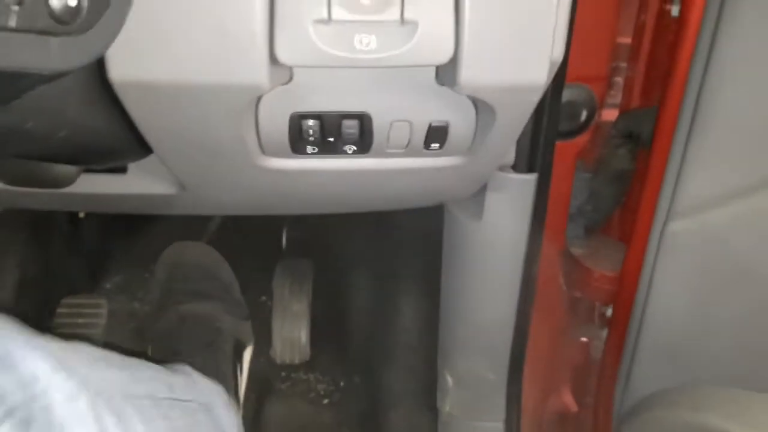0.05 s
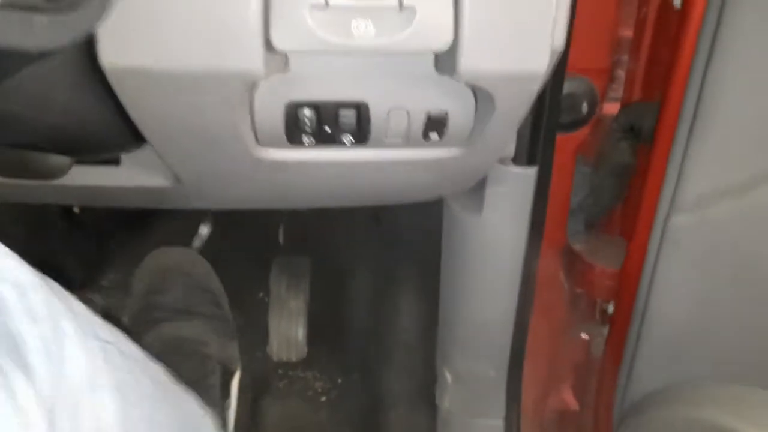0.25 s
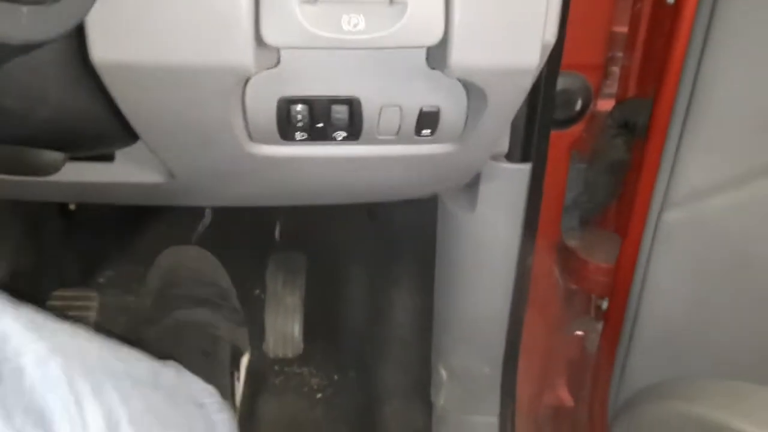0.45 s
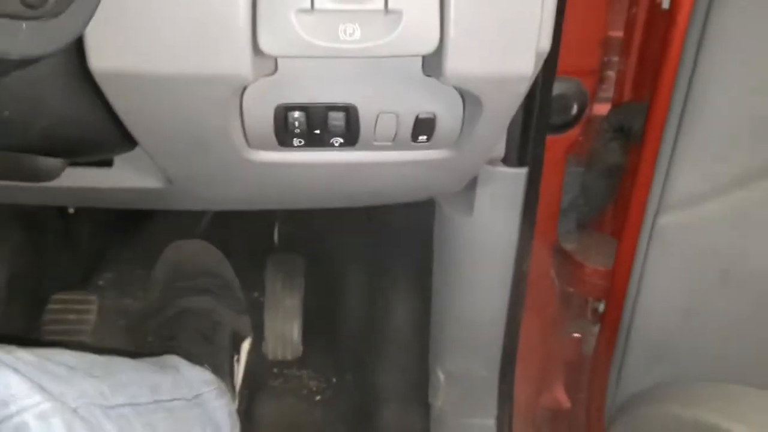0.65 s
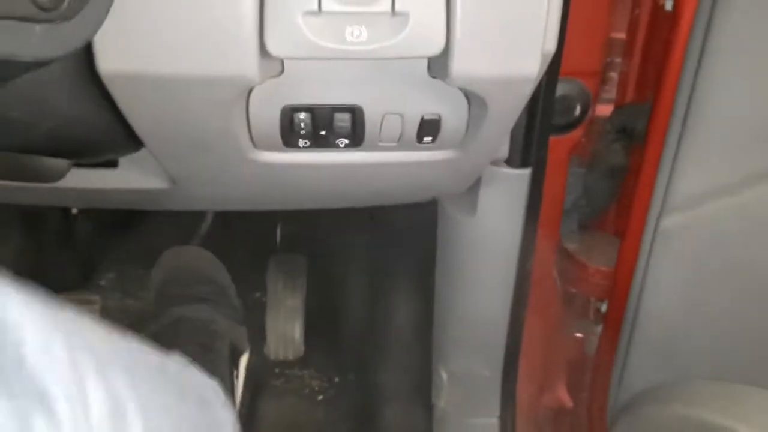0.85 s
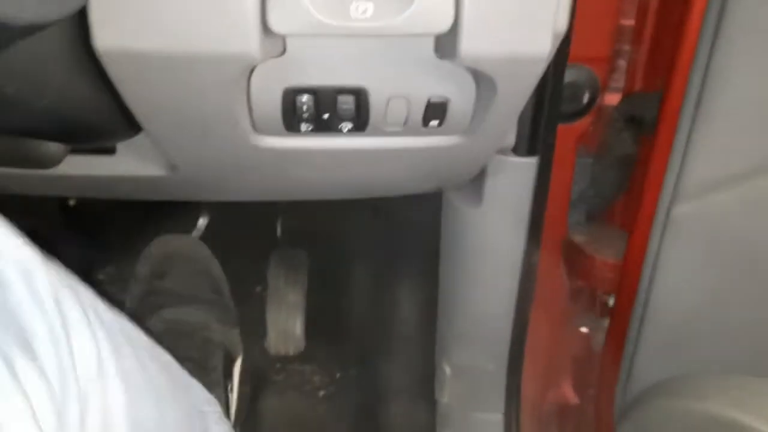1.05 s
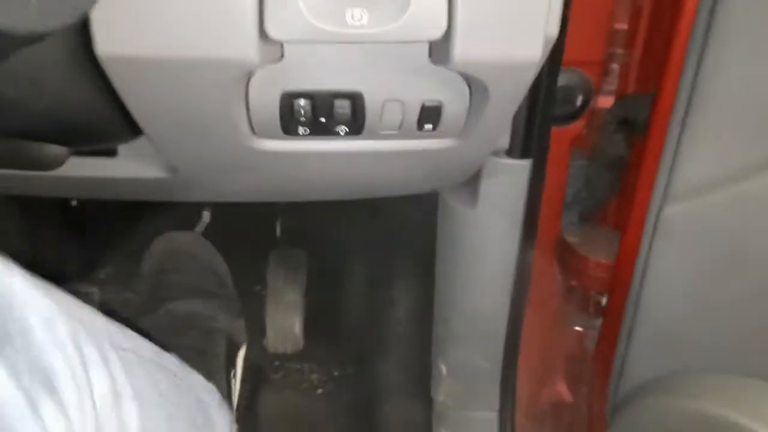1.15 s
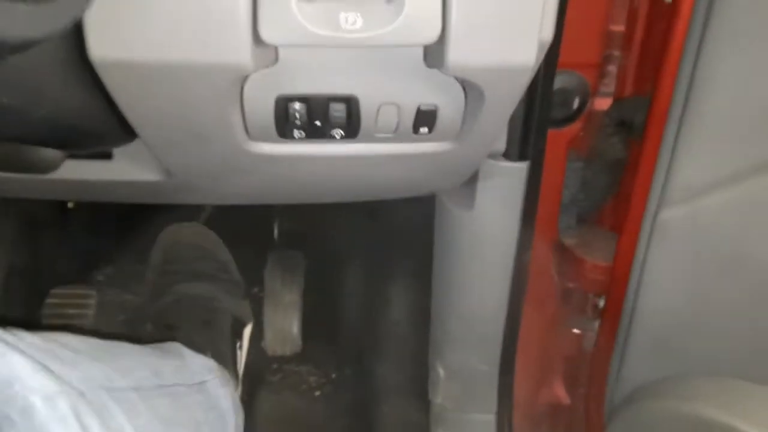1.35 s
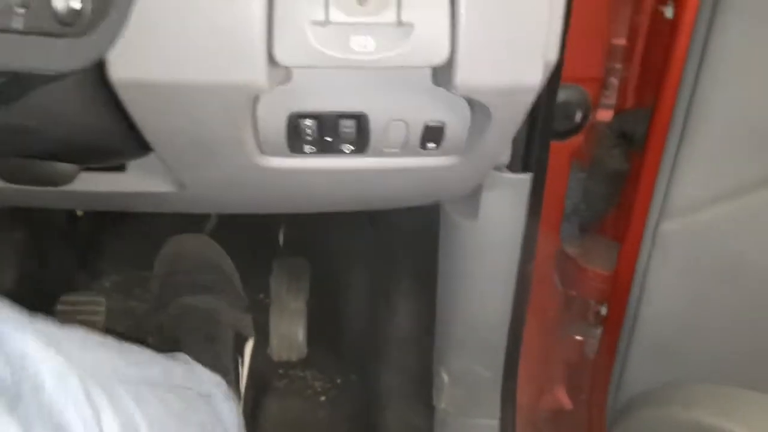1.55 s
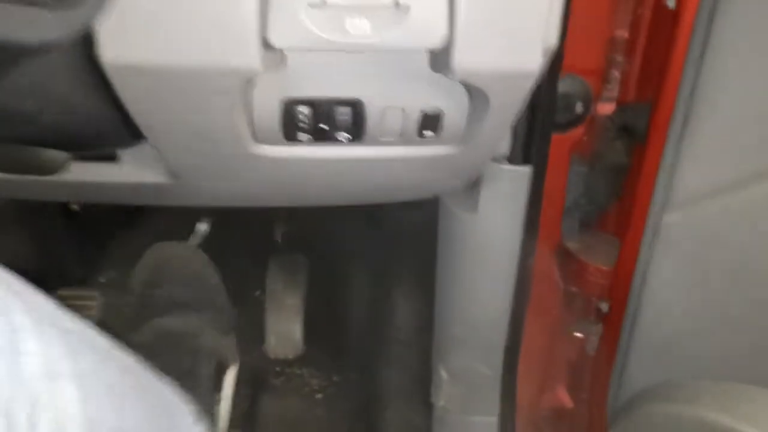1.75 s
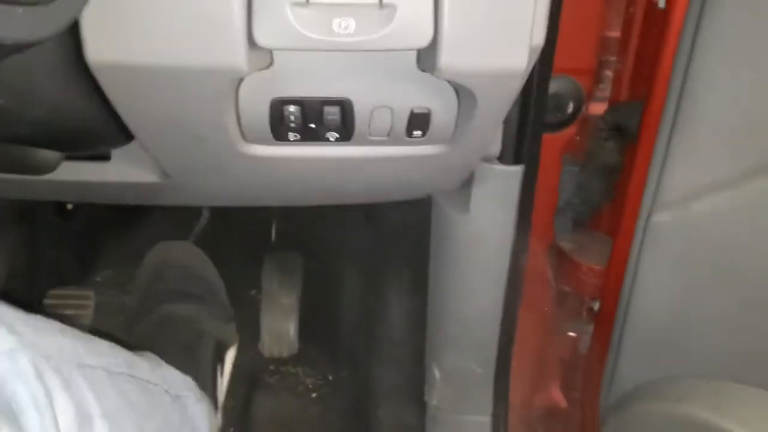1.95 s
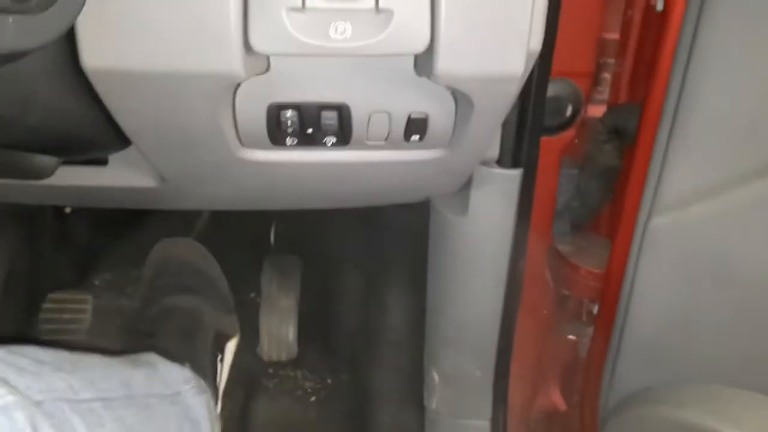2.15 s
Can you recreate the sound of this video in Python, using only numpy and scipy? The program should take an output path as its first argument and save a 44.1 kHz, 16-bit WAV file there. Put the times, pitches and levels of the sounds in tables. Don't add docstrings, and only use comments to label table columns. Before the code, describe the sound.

A brake pedal is pumped three times in a quiet parked car. The first, strongest stroke runs about 0.14-0.45 s, with a double thunk at 0.2 and 0.32; the second about 0.87-1.17, the third 1.6-1.9. Each is a cluster of dull floor thuds, hollow bracket ring, sharp linkage clacks and trim rattle. Between them come faint creaks, small clicks, cloth rustle and low cabin sway. Close, dry phone sound.

```python
import sys
import numpy as np
from scipy import signal
from scipy.fft import rfft, irfft
from scipy.io import wavfile
from scipy.ndimage import uniform_filter1d

SR = 44100
rng = np.random.default_rng(int(sys.argv[2]) if len(sys.argv) > 2 else 0)


def undo_db(level):
    steps = np.asarray(level, float) / 20
    return 10 ** steps


def put_to_file(sound):
    columns = np.atleast_2d(sound).T
    safe = np.clip(columns, -1, 1)
    whole_steps = np.round(safe * 32767)
    wavfile.write(sys.argv[1], SR, whole_steps.astype(np.int16))


N = 97020


def evened(x):
    return x / np.sqrt(np.mean(x ** 2) + 1e-20)


def noise(length):
    return rng.standard_normal((2, length))


def decay(t, t60_s):
    return -60 * t / t60_s


def read(points, hz):
    f, value = np.transpose(points)
    return np.interp(np.log(hz + 1), np.log(f + 1), value)


def curve(points):
    s, db = np.transpose(points)
    return undo_db(np.interp(np.arange(N) / SR, s, db))


def add(mix, start_s, sound):
    part = mix[..., round(start_s * SR):][..., :sound.shape[-1]]
    part += sound[..., :part.shape[-1]]


def coloured(x, points):
    hz = np.fft.rfftfreq(x.shape[-1], 1 / SR)
    inside = (hz > points[0][0]) & (hz < points[-1][0])
    return evened(irfft(rfft(x) * undo_db(read(points, hz)) * inside, x.shape[-1]))


def band(x, centre_hz, width):
    hz = np.fft.rfftfreq(x.shape[-1], 1 / SR) + 1
    detuning = hz / centre_hz - centre_hz / hz
    return evened(irfft(rfft(x) / (1 + 1j * detuning / width) ** 2, x.shape[-1]))


def struck(rows, rise_s, t60_s, db, sag=0.):
    out, t = np.zeros(N), np.arange(SR // 3) / SR
    phases = rng.random((len(rows), 1))
    for (start_s, level_db, pitch_hz), phase in zip(rows, phases):
        turns = pitch_hz * (t * (1 - sag) + sag * 0.025 * (1 - np.exp(-t / 0.0069)))
        rise = np.sin(np.pi / 2 * np.minimum(t / rise_s, 1)) ** 2
        shape = rise * undo_db(decay(t, t60_s))
        add(out, start_s, undo_db(level_db + db) * shape * np.sin(2 * np.pi * (turns + phase)))
    return out


# start_s, level_db
PIVOT_DRAG = [(0, -58.5), (.10, -65), (.22, -30.5), (.4, -31.5), (.5, -58.5), (.71, -72.5), (.75, -65.5),
              (.82, -58.5), (.95, -31), (1.14, -35.5), (1.28, -59.5), (1.455, -70), (1.49, -55),
              (1.56, -62.5), (1.7, -32), (1.88, -33), (1.95, -52.5), (2.2, -80.5)]
# pitch_hz, width_hz, level_db
BODY_RESONANCES = [(71.5, 21, -0.5), (102, 44.3, 5.5), (158.6, 39.8, 5), (320, 76, -3.5)]
# pitch_hz, level_db
TRIM_COLOUR = [(360, -16.5), (420, -1.5), (560, -5), (640, -10.5), (850, -14.5), (1300, -16.5), (2400, -18)]
SLIPS_PER_S, SLIP_SPREAD_DB = 500, 6
DRAG_DB, TRIM_DB = 1.5, -16.5
HEAVY = 1.126


def drag():
    size = undo_db(SLIP_SPREAD_DB * np.minimum(rng.exponential(1, N), 4))
    happens = rng.random(N) < SLIPS_PER_S / SR
    slips = size * happens * rng.choice([-1, 1], N)
    hz = np.fft.rfftfreq(N, 1 / SR)
    response = sum(undo_db(db) / (1 + 2j * (hz - f) / w) ** 2 for f, w, db in BODY_RESONANCES)
    level = curve(PIVOT_DRAG) * undo_db(DRAG_DB)
    push = level * (level / level.max()) ** (HEAVY - 1)
    low = push * evened(irfft(rfft(slips) * response, N))
    trim = level * undo_db(TRIM_DB) * coloured(noise(N), TRIM_COLOUR)
    return low, trim


# start_s, level_db, pitch_hz
BRACKET_CREAKS = [(0, -50.5, 293), (.105, -38, 331), (.265, -37, 301), (.52, -46.5, 275), (.735, -50, 311),
                  (.825, -45, 330), (1.31, -50.5, 274), (1.465, -53.5, 314), (1.572, -46, 302),
                  (1.632, -28, 330), (1.85, -37.5, 304), (2.02, -49.5, 280)]
RING_DB = 2


def creaks():
    return struck(BRACKET_CREAKS, rise_s=0.023, t60_s=0.15, db=RING_DB)


# start_s, level_db
LEG_MOVES = [(0, -70), (.12, -65.5), (.35, -56.5), (.55, -66), (.69, -77.5), (.78, -65.5), (1., -64.5),
             (1.2, -60.5), (1.44, -71.5), (1.6, -65.5), (1.85, -60.5), (2.05, -63), (2.2, -80.5)]
# pitch_hz, level_db
CLOTH_COLOUR = [(400, -5), (700, -13.5), (1700, -14), (5000, -11.5), (8500, -12.5), (9300, -23),
                (12500, -17.5), (16200, -23)]
LEG_DB, PATCH_DB, FLICKER_DB = 1.5, 0.7, 0.7


def cloth():
    frames = N // 64 + 5
    a, b, c, d, patches = rng.standard_normal((frames, 129, 5)).T
    patches = uniform_filter1d(patches, size=5, axis=0)
    patches = evened(uniform_filter1d(patches, size=30, axis=1))
    flicker = evened(uniform_filter1d(rng.standard_normal(frames), size=6))
    z = np.array([a + 1j * b, c + 1j * d]) * undo_db(PATCH_DB * patches + FLICKER_DB * flicker)
    rustle = signal.istft(z, nperseg=256, noverlap=192)[1][:, :N]
    return curve(LEG_MOVES) * undo_db(LEG_DB) * coloured(rustle, CLOTH_COLOUR)


# start_s, level_db, pitch_hz
BODY_SWAYS = [
    (0.451, -40, 97),
    (0.489, -56, 281.5),
    (1.169, -43, 81),
    (1.93, -37, 61),
    (2.001, -56, 280),
]
RUMBLE_HZ, RUMBLE_DB = 95, -2
DEEP_HZ, DEEP_DB = 45, 4.5
SWAY_RISE_S, SWAY_T60_S, SWAY_WIDTH = 0.022, 0.38, 0.4


def rumble():
    leg = curve(LEG_MOVES)
    out = leg * undo_db(RUMBLE_DB) * band(noise(N), RUMBLE_HZ, 0.35)
    out += leg * undo_db(DEEP_DB) * band(noise(N), DEEP_HZ, 0.6)
    t = np.arange(SR // 2) / SR
    for start_s, level_db, pitch_hz in BODY_SWAYS:
        shape = np.minimum(t / SWAY_RISE_S, 1) * undo_db(level_db + decay(t, SWAY_T60_S))
        width = SWAY_WIDTH * np.sqrt(RUMBLE_HZ / pitch_hz)
        add(out, start_s, shape * band(noise(len(t)), pitch_hz, width))
    return out


# start_s, level_db, pitch_hz
BRACKET_JOLTS = [(0.114, -49, 330), (0.138, -29, 315), (0.162, -29, 300), (0.2, -17.5, 311),
                 (0.222, -17.5, 321.7), (0.252, -38, 310), (0.31, -19, 324), (0.324, -12.5, 329.7),
                 (0.339, -15.5, 341), (0.751, -52.5, 311), (0.843, -39, 316), (0.885, -25.5, 305),
                 (0.938, -17, 333), (0.957, -23.5, 299.6), (1.009, -27.5, 361), (1.033, -20.5, 325),
                 (1.073, -41, 372), (1.088, -20.5, 319), (1.162, -39.5, 356), (1.485, -53.5, 322),
                 (1.586, -40, 289), (1.616, -28.5, 313), (1.675, -28.5, 290), (1.698, -15, 307.4),
                 (1.816, -14.5, 314)]


def rings():
    return struck(BRACKET_JOLTS, rise_s=0.007, t60_s=0.1, db=RING_DB)


PAN_SWING = dict(rise_s=0.014, t60_s=0.072, db=7.5, sag=0.06)
# start_s, level_db, pitch_hz
MORE_PAN_KNOCKS = [(.2, -19.5, 100), (.238, -23.5, 95.5), (.283, -34, 80.3), (.48, -32.5, 95), (1.115, -27, 98),
                   (1.145, -23.5, 87.5), (1.66, -36, 101.2), (1.735, -32, 81.5), (1.785, -23, 110),
                   (1.822, -16.5, 84), (.133, -41, 90.4), (.865, -33, 85), (1.61, -47, 89.5), (1.635, -28, 139.4),
                   (1.85, -20.5, 88.3)]


def more_thuds():
    return struck(MORE_PAN_KNOCKS, **PAN_SWING)


# start_s, level_db, pitch_hz
PAN_KNOCKS = [(0.137, -36.5, 138), (0.166, -24, 81.4), (0.196, -14, 153), (0.221, -19, 120),
              (0.242, -24, 179), (0.316, -11.5, 160), (0.337, -14, 139), (0.366, -12.5, 107.4),
              (0.394, -19, 95), (0.422, -30, 115), (0.878, -29, 176.3), (0.906, -27, 109),
              (0.929, -14, 148), (0.973, -24.5, 113), (0.998, -31, 140), (1.03, -25, 150),
              (1.058, -21, 123), (1.084, -16, 155), (1.149, -34.5, 102.6), (1.642, -26.5, 110),
              (1.697, -12.5, 136), (1.753, -18.5, 158), (1.811, -14.5, 154), (1.827, -17.5, 69),
              (1.849, -30, 102), (1.872, -30.5, 71.5)]


def thuds():
    return struck(PAN_KNOCKS, **PAN_SWING)


# start_s, level_db, fizz_db (over 9 kHz), ping_hz
LINKAGE_CLACKS = [(0.138, -46, -16.5, 4250), (0.158, -37, -13, 4380), (0.2039, -28.5, -4, 5530),
                  (0.2401, -37, 2.5, 4300), (0.3089, -26.5, -25, 2940), (0.3384, -28.5, -19.5, 4040),
                  (0.8642, -45, -13, 4440), (0.8836, -38.5, -13, 4830), (0.9342, -39, -17, 1953),
                  (0.9437, -38.5, -2, 6000), (0.9767, -37.5, -12, 5730), (1.043, -47.5, -38, 4470),
                  (1.0908, -38.5, -45, 2340), (1.1605, -42.5, -11.5, 3550), (1.6145, -47.5, -12, 4570),
                  (1.6386, -39, -13, 4620), (1.7024, -34.5, -5.5, 7530), (1.727, -38.5, -24, 6330),
                  (1.7376, -39, -5.5, 7160), (1.7906, -45.5, -25, 4290), (1.8174, -33, -32, 2310)]
# pitch_hz, level_db
SNAP_COLOUR = [(1800, -7), (2300, 4.5), (3000, 1), (4200, 2), (5500, -5), (8500, -1.5), (9100, -29.5)]
# pitch_hz, level_db
FIZZ_COLOUR = [(8800, -6), (10000, -9), (13000, 0), (15000, -8), (16200, -22)]
SNAP_DB, SNAP_RISE_S, SNAP_T60_S = -4, 0.0025, 0.066
SNAP_TAIL_DB, SNAP_TAIL_T60_S = -12.5, 0.44
GRIT_DB, GRIT_GROWS_S = 4, 0.025
PING_DB, PING_T60_S, PING_WIDTH = 1.5, 0.053, 0.2
TONE_DB, TONE_T60_S = -6, 0.03
LINK_HZ, LINK_DB = 4220, -6
FIZZ_DB, FIZZ_T60_S = 3.5, 0.043
FIZZ_TAIL_DB, FIZZ_TAIL_T60_S, FIZZ_TAIL_RISE_S = -25.5, 0.53, 0.022


def clacks():
    out, t = np.zeros((2, N)), np.arange(SR // 4) / SR
    rise = np.minimum(t / SNAP_RISE_S, 1) ** 2
    for start_s, level_db, fizz_db, ping_hz in LINKAGE_CLACKS:
        a, b, d, e = rng.standard_normal((4, 2, len(t)))
        rough = evened(uniform_filter1d(e[0], size=60))
        grit = undo_db(GRIT_DB * np.minimum(t / GRIT_GROWS_S, 1) * rough)

        snap_shape = grit * undo_db(decay(t, SNAP_T60_S))
        snap_tail = undo_db(SNAP_TAIL_DB + decay(t, SNAP_TAIL_T60_S))
        snap = coloured(a, SNAP_COLOUR) * (snap_shape + snap_tail)

        ping = undo_db(PING_DB + decay(t, PING_T60_S)) * band(d, ping_hz, PING_WIDTH)
        tone = np.sin(2 * np.pi * (ping_hz * t + d[:, :1]))
        tone = tone + undo_db(LINK_DB) * np.sin(2 * np.pi * (LINK_HZ * t + e[:, :1]))
        ping = ping + undo_db(TONE_DB + decay(t, TONE_T60_S)) * tone

        fizz_shape = grit * undo_db(fizz_db + FIZZ_DB + decay(t, FIZZ_T60_S))
        fizz_tail = np.minimum(t / FIZZ_TAIL_RISE_S, 1) * undo_db(FIZZ_TAIL_DB + decay(t, FIZZ_TAIL_T60_S))
        fizz = coloured(b, FIZZ_COLOUR) * (fizz_shape + fizz_tail)
        add(out, start_s - SNAP_RISE_S / 2, rise * undo_db(level_db + SNAP_DB) * (snap + ping + fizz))
    return out


# start_s, level_db, panel_hz
PANEL_BLOWS = [(.200, -31.5, 667), (.212, -30, 606), (.240, -33.5, 670), (.309, -34.5, 845),
               (.318, -27, 539), (.338, -24.5, 897), (.934, -31, 623), (.976, -37, 1320), (1.026, -40, 640),
               (1.090, -29.5, 965), (1.693, -31.5, 528), (1.728, -37.5, 710), (1.757, -47.5, 540),
               (1.817, -27, 910)]
# start_s, level_db, pitch_hz, t60_s, width (share of pitch)
TRIM_TICKS = [(0.35, -55, 5040, 0.1, .8), (0.58, -61, 610, 0.19, 0.32), (0.595, -58, 3450, 0.03, 0.55),
              (1.32, -56.5, 572, 0.28, 0.46), (1.875, -39.5, 3880, 0.044, 0.73),
              (1.877, -42, 8000, 0.046, .15), (2.05, -58, 581, 0.3, 0.75), (2.07, -61, 1620, 0.26, 0.56),
              (.15, -46.5, 695, 0.17, .5), (.88, -45, 744, 0.09, 0.64), (1.6, -50.5, 616, 0.2, 0.27)]
BLOW_RISE_S, BLOW_T60_S = 0.003, 0.07
PANEL_DB, PANEL_WIDTH = -2.5, 0.35


def panels():
    out, t = np.zeros((2, N)), np.arange(SR // 4) / SR
    for start_s, level_db, panel_hz in PANEL_BLOWS:
        a, b = rng.standard_normal((2, 2, len(t)))
        buzz = coloured(a, TRIM_COLOUR) + undo_db(PANEL_DB) * band(b, panel_hz, PANEL_WIDTH)
        shape = np.minimum(t / BLOW_RISE_S, 1) * undo_db(level_db + decay(t, BLOW_T60_S))
        add(out, start_s, shape * buzz)
    for start_s, level_db, pitch_hz, t60_s, width in TRIM_TICKS:
        shape = np.minimum(10 * t / t60_s, 1) * undo_db(level_db + decay(t, t60_s))
        add(out, start_s, shape * band(noise(len(t)), pitch_hz, width))
    return out


# pitch_hz, level_db, t60_s
MODES = [(416.4, -7.5, 0.13), (521, -0.5, 0.082), (625.6, -7, 0.14), (665.4, -4, 0.12), (838, -7, 0.21),
         (990, -14, 0.31), (1050.6, -8.5, 0.13), (1205, -6.5, 0.11), (1343, -9.5, .13), (1455, -8.5, .12),
         (1990, -15.5, .12)]
MODE_DB, MODE_SPREAD_DB = -8, 4


def panel_modes():
    out, t = np.zeros((2, N)), np.arange(SR // 4) / SR
    pitch_hz, mode_db, t60_s = np.transpose(MODES)[:, :, None]
    for start_s, level_db, _ in PANEL_BLOWS:
        share, detune, phase = rng.standard_normal((3, 2, len(pitch_hz), 1))
        level = undo_db(mode_db + MODE_SPREAD_DB * share + decay(t, t60_s))
        turns = pitch_hz * (1 + detune / 100) * t
        ring = level * np.sin(2 * np.pi * (turns + phase))
        rise = np.minimum(t / BLOW_RISE_S, 1)
        add(out, start_s, rise * undo_db(level_db + MODE_DB) * ring.sum(axis=1))
    return out


# start_s, level_db, pitch_hz
PIN_CLICKS = [(1.329, -47.5, 610), (1.6, -50, 970), (1.3295, -54, 1140), (1.2, -56, 1800),
              (1.3905, -49.5, 2050), (1.6, -45, 2450), (1.3905, -57, 3800), (.309, -22, 3050),
              (.3385, -32.5, 4400), (1.7905, -44, 4340), (1.8178, -30, 2200), (1.8178, -31, 4260),
              (1.0915, -37, 2280), (1.0915, -37.5, 4000), (1.2, -48, 3600), (.3185, -36.5, 3100),
              (1.694, -42, 3500)]


def clicks():
    return struck(PIN_CLICKS, rise_s=0.001, t60_s=0.018, db=0)


# pitch_hz, likeness (0 to 1)
PORT_LIKENESS = [(400, .995), (700, .9), (1400, .5), (3000, .4)]
# pitch_hz, level_db (left minus right)
PORT_LEAN = [(60, 2), (500, 2.4), (1400, 1.5), (2800, -3), (5500, -10), (10000, 0), (14000, .3)]
LEFT_LAG_S = -0.00018


def ports(a, b):
    hz = np.fft.rfftfreq(N, 1 / SR)
    same = np.clip(read(PORT_LIKENESS, hz), 0, 1)
    lean = undo_db(read(PORT_LEAN, hz) / 2)
    a, b = rfft(a), rfft(b)
    left = a * lean * np.exp(-2j * np.pi * hz * LEFT_LAG_S)
    right = (same * a + np.sqrt(1 - same ** 2) * b) / lean
    return irfft(np.array([left, right]), N)


def scene():
    low, trim = drag()
    body = low + creaks() + rings() + more_thuds() + thuds()
    a, b = trim + cloth() + rumble() + clacks() + panels() + panel_modes()
    seating = clicks()
    return ports(a + body + seating, b + seating)


def low_pass(x):
    return signal.sosfilt(signal.butter(12, 16150, fs=SR, output="sos"), x)


def record(dry):
    low_cut = signal.butter(4, 60, "highpass", fs=SR, output="sos")
    mix = signal.sosfilt(low_cut, dry)
    return low_pass(mix)


dry = scene()
out = record(dry)
put_to_file(out)
```